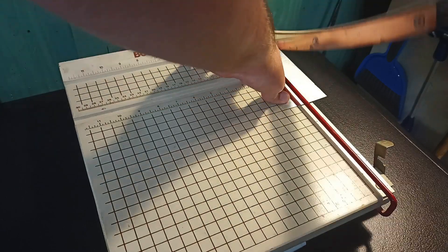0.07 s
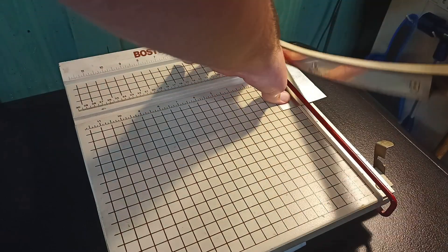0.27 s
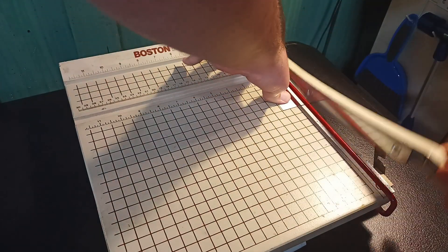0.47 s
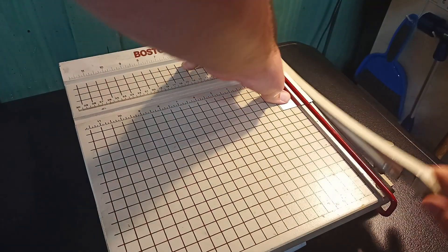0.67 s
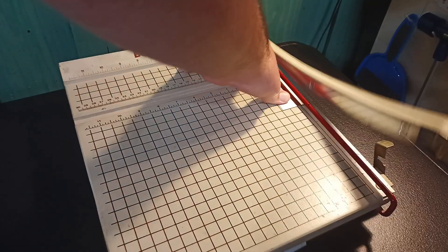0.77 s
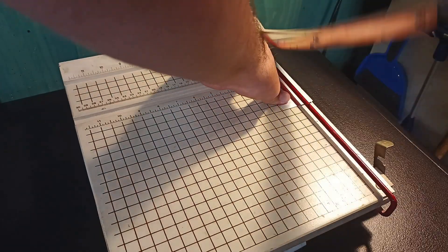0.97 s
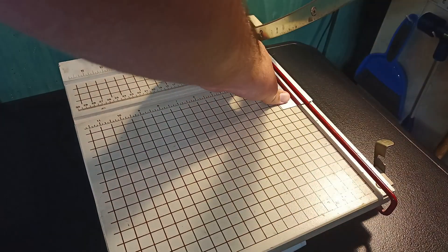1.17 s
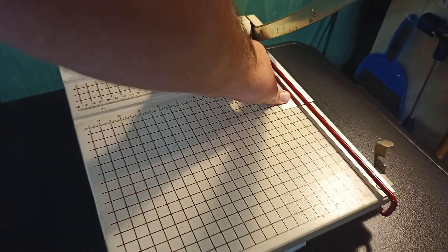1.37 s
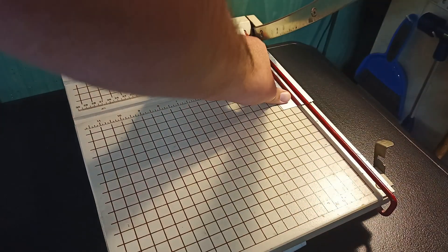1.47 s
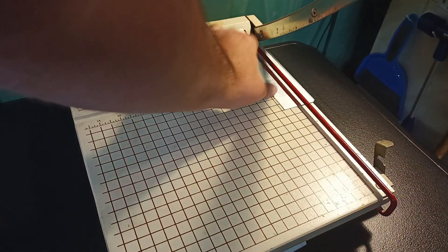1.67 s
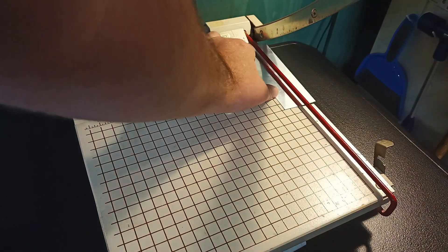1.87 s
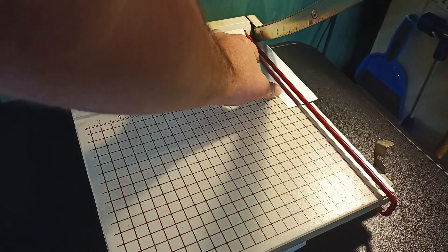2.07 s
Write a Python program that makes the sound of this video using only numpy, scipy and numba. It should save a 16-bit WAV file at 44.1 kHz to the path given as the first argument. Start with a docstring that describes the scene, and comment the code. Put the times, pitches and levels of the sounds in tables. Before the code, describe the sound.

Lever cutter blade shearing a metal strip, rasping down and up, then knocks and light ticks.

```python
"""A lever paper cutter shears a strip of thin aluminium in a small, quiet workshop, stereo microphone close.
The blade grinds down along the fixed edge, its stick-slip friction ringing arm and board, and catches once.
It scrapes back up, catches again, and at 1.2 s the lever knocks against its stop.
Last, a hand slides the strip forward with a light scrape and small ticks against the guide."""
import sys
import numpy as np
from scipy import signal
from scipy.fft import rfft, irfft
from scipy.io import wavfile
from scipy.ndimage import uniform_filter1d
from numba import njit

SR = 44100
rng = np.random.default_rng(int(sys.argv[2]) if len(sys.argv) > 2 else 0)


def persist_wave(psi):
    """Save psi, clipped to +-1, as 16-bit WAV."""
    counts = np.round(np.clip(psi, -1, 1) * 32767).astype(np.int16)
    wavfile.write(sys.argv[1], SR, np.atleast_2d(counts).T)


N = 92610
T = np.arange(N) / SR
FREQS = np.maximum(np.arange(N + 1) * SR / (2 * N), 1)

# likeness of left and right at the microphone (f/Hz, correlation)
LIKENESS = [(220, 0.99), (400, 0.85), (700, 0.17), (3500, .1), (8000, 0.82)]
# modes of the cutter's board (f/Hz, level/dB, t60/s)
BOARD_MODES = [(82, -12.5, .35), (146.8, -3, 0.45), (175, -12.5, 0.32), (229.3, 5, 0.21)]
# spectrum of the dull thump of board and table (f/Hz, level/dB)
THUMP_COLOUR = [(30, -38.5), (70, -6.5), (200, 8), (520, -13.5), (2000, -61.5)]
# spectrum of the steel edge's hiss (f/Hz, level/dB)
HISS_COLOUR = [(2600, -9), (3600, -1), (6800, -1), (8200, -8.5), (9400, -11.5), (10500, -19.5),
               (15500, -27)]


def amp(db):
    """Decibels to gain."""
    return 10 ** (np.asarray(db) / 20)


def unit(x):
    """Scale to rms 1."""
    return x / np.sqrt(np.mean(x ** 2) + 1e-30)


def burst(x):
    """Scale a decaying sound to rms 1 over its first 10 ms."""
    return x / np.sqrt(np.mean(x[:, :SR // 100] ** 2))


def steady(x):
    """Scale to a running rms of 1."""
    power = uniform_filter1d(uniform_filter1d(np.mean(x ** 2, axis=0), size=900), size=900)
    return x / np.sqrt(np.abs(power) + 1e-20)


def along_hz(points):
    """Join (f/Hz, value) points on a log-frequency axis."""
    hz, value = np.array(points).T
    return np.interp(np.log(FREQS), np.log(hz), value)


def colour(x, points, tilt=0):
    """Minimum-phase filter with the given spectrum, tilted in dB per octave above 800 Hz."""
    spectrum_db = along_hz(points) + tilt * np.log2(np.maximum(FREQS, 800))
    cepstrum = irfft(np.log(amp(spectrum_db)))
    cepstrum[1:N] *= 2
    cepstrum[N + 1:] = 0
    return irfft(rfft(x, 2 * N) * np.exp(rfft(cepstrum)))[..., :N]


def noise():
    """Stereo noise, left and right alike in the bass and the high treble."""
    white = rng.standard_normal((2, N))
    likeness = np.clip(along_hz(LIKENESS), -.99, .99)
    mid, side = irfft(rfft(white, 2 * N) * np.sqrt([1 + likeness, 1 - likeness]))[:, :N]
    return np.array([mid + side, mid - side])


def decay(t60):
    """Exponential fade, 60 dB in t60 seconds."""
    return np.exp(-np.log(1000) * np.minimum(T / max(t60, 1e-3), 10))


def at(x, start):
    """Delay a sound to its start in seconds."""
    return np.pad(x, ((0, 0), (int(start * SR), 0)))[:, :N]


def drive(force, response):
    """Play a force through a body's response."""
    return signal.fftconvolve(np.atleast_2d(force), response, axes=1)[:, :N]


def mode(hz, db, t60):
    """One ringing mode, out of step between left and right where their likeness is low."""
    apart = np.arccos(np.clip(np.interp(hz, FREQS, along_hz(LIKENESS)), -1, 1)) / 2
    return amp(db) * np.sin(2 * np.pi * hz * T - np.array([[1], [-1]]) * apart) * decay(t60)


def body(modes, spectrum, noise_db, t60):
    """A body's response: its clear modes plus fading noise for the dense ringing between them."""
    return unit(sum(modes)) + amp(noise_db) * unit(colour(noise() * decay(t60), spectrum))


@njit
def sweep(x, hz, width):
    """Band-pass with a moving centre; width is 1/Q."""
    y, band_state, low_state = np.empty(len(x)), 0., 0.
    for i in range(len(x)):
        g = np.tan(np.pi * hz[i] / SR)
        band = (band_state + g * (x[i] + 1e-18 - low_state)) / (1 + g * (g + width))
        band_state = 2 * band - band_state
        low_state += 2 * g * band
        y[i] = width * band
    return y


def friction(slips_per_s=1600, scatter_db=1, judder_db=1, judder_hz=70):
    """Dense stick-slip clicks of uneven size, swelling and sinking with a slight judder."""
    hold = int(SR / judder_hz)
    judder = uniform_filter1d(rng.standard_normal(N)[np.arange(N) // hold], hold // 2)
    clicks = (rng.random(N) < slips_per_s / SR) * rng.choice([-1, 1], N)
    return clicks * amp(scatter_db * rng.standard_normal(N) + judder_db * judder)


def rasp(x, depth_db=3.5):
    """The grinding surges unevenly: narrow bands swell and sink for a few hundredths of a second."""
    _, _, bands = signal.stft(x, nperseg=512)
    surge = rng.standard_normal(bands.shape[1:])
    for axis in (0, 1):
        surge = uniform_filter1d(surge, size=4, axis=axis)
    return signal.istft(bands * amp(depth_db * unit(surge)))[1][:, :N]


def stroke(levels, upward, blade_db, edge_db, grind_db, hiss_db, board_tilt, left_db):
    """One pass of the blade: friction shakes the board, rings the blade and hisses on the edge."""
    # where the edges touch (t/s, place from 0 at the pivot to 1 at the tip)
    contact = [(.15, 0.71), (.23, 0.19), (.48, 0.37), (.58, 0.23), (.76, 0.69), (.85, 1), (.90, 0.49),
               (.93, 0.21), (1.04, 0.16), (1.11, 0.58)]
    # modes of blade and arm (f/Hz, level going down/dB, level going up/dB)
    blade_modes = [(444.5, 11.5, 7), (559.6, -22, -12), (874.6, -2.5, -15.5), (1391, 2, -5),
                   (1407, -26, -22.5), (1601, 7, -6), (1940, 7, -16.5)]
    # spectrum of the blade's dense ringing (f/Hz, level/dB)
    grind_colour = [(250, -31), (390, -7), (850, 6.5), (1060, 0.5), (1350, 6), (2200, 3), (3500, -2),
                    (5000, -55)]
    # modes of the steel edge (f/Hz, level/dB)
    edge_modes = [(5305, -11.5), (6358, 3), (6675, -1.5), (7028, 0), (8253, -16)]
    pivot_hz, tip_hz = 338, 3350  # the grinding rises in pitch towards the tip

    times, *curves = np.array(levels).T
    fade = np.interp(T, [times[0] - .01, times[0] + .005, times[-1] - .005, times[-1] + .015], [0, 1, 1, 0])
    board_gain, blade_gain, edge_gain = (fade * amp(np.interp(T, times, db)) for db in curves)
    slips = friction()
    place = np.clip(np.interp(T, *np.array(contact).T), 0, 1)
    focused = sweep(slips, pivot_hz * (tip_hz / pivot_hz) ** place, width=.9) + 0.37 * slips

    board_tones = [mode(hz, db + board_tilt * np.log2(hz), t60 / 2) for hz, db, t60 in BOARD_MODES]
    board = body(board_tones, THUMP_COLOUR, noise_db=-6.5, t60=0.14)
    blade_tones = [mode(hz, up if upward else down, t60=0.12) for hz, down, up in blade_modes]
    blade_tones[0] *= amp(np.array([[left_db], [-left_db]]) / 2)  # the arm's lowest mode sits off centre
    blade = body(blade_tones, grind_colour, grind_db, t60=0.14)
    edge_tones = [mode(hz, db, t60=0.043) for hz, db in edge_modes]
    edge = body(edge_tones, HISS_COLOUR, hiss_db, t60=0.051)

    rumble = board_gain * steady(drive(slips, board))
    grind = amp(blade_db) * blade_gain * steady(rasp(drive(focused, blade)))
    hiss = amp(edge_db) * edge_gain * steady(rasp(drive(slips, edge)))
    return rumble + grind + hiss


def edge_snaps():
    """Bright cracks where the edge catches and snaps free."""
    # catches of the edge (t/s, level/dB, t60/s)
    catches = [(0.631, -22, 0.048), (1.186, -22.5, 0.055)]
    return sum(amp(db) * at(burst(colour(noise() * decay(t60), HISS_COLOUR)), start)
               for start, db, t60 in catches)


def lever_knocks(push_s=0.0047):
    """The lever hits its stop and rebounds: each hard clack comes with a thud of board and table."""
    # hits on the stop (t/s, relative thud level/dB, clack level/dB, clack tilt/dB per octave)
    hits = [(1.2237, -16, -18, 0.5), (1.228, -19, -33.5, 2), (1.2369, -19, -30, -7), (1.274, -14, -25, -17),
            (1.387, -41, -24.5, 2), (1.3925, -9.5, -18.5, -6.5)]
    # spectrum of the clack (f/Hz, level/dB)
    clack_colour = [(60, -0.5), (480, 3.5), (900, -5), (1500, -8), (6000, -30), (12000, -59)]
    push = np.sin(np.pi * np.minimum(T / push_s, 1))
    board = burst(drive(push, sum(mode(*row) for row in BOARD_MODES)))
    knocks = 0
    for start, thud_db, clack_db, tilt in hits:
        thud = amp(-4) * board + amp(-10.5) * burst(colour(noise() * decay(0.15), THUMP_COLOUR))
        clack = burst(colour(noise() * (decay(0.09) + amp(-11) * decay(0.2)), clack_colour, tilt))
        knocks += at(amp(thud_db) * thud + amp(clack_db) * clack, start)
    return knocks


def strip_slides(release_t60=0.075):
    """Short gritty rubs of strip and hand over the board."""
    # rubs on the board (t/s, level/dB, attack/s, hold/s)
    rubs = [(1.394, -42, 0.013, 0.018), (1.517, -56.5, 0.019, 0.077), (1.777, -34, 0.024, .025),
            (1.964, -53.5, .006, 0.016)]
    # spectrum of the rubbing (f/Hz, level/dB)
    rub_colour = [(600, -16), (1000, 5.5), (2300, -12), (4500, 12.5), (7500, 9.5), (9500, 3.5),
                  (15000, -12.5)]
    grit = steady(colour(drive(friction(), noise() * decay(0.011)), rub_colour))
    envelope = 0
    for start, db, attack, hold in rubs:
        rise = np.clip((T - start) / attack, 0, 1)
        fall = np.exp(-np.log(1000) * np.maximum(T - start - attack - hold, 0) / release_t60)
        envelope += amp(db) * rise * fall
    return grit * envelope


def strip_ticks():
    """Light taps against the guide ring the thin strip."""
    # taps on the guide (t/s, level/dB, tilt/dB per octave)
    taps = [(1.794, -38.5, -7), (1.986, -40.5, 8), (2.009, -50.5, 4), (2.067, -44.5, -4.5)]
    # spectrum of a tap (f/Hz, level/dB)
    tap_colour = [(220, -2), (550, -13), (1000, 3), (2200, 9), (2800, 9.5), (6200, 1), (15000, -39.5)]
    # modes of the aluminium strip (f/Hz, level/dB)
    strip_modes = [(1470, -4.5), (3260, 1.5), (3990, 1), (5860, 4)]
    ring = burst(sum(mode(hz, db, t60=0.1) for hz, db in strip_modes))
    ticks = 0
    for start, db, tilt in taps:
        tap = burst(noise() * decay(0.19)) + amp(-4.5) * ring
        ticks += amp(db) * at(burst(colour(tap, tap_colour, tilt)), start)
    return ticks


def scene():
    """The cutter from close by, with the workshop's short tail and faint room tone behind it."""
    # course of the downstroke (t/s, relative levels of board/dB, blade/dB, edge/dB)
    down_levels = [(.04, -98, -80, -65), (.13, -108, -59.5, -51), (.165, -40.5, -41.5, -38.5),
                   (.22, -28.5, -38.5, -43.5), (.35, -29, -33, -35), (.43, -19.5, -27.5, -30.5),
                   (.52, -16, -26.5, -25.5), (.58, -22.5, -18, -23.5), (.65, -22.5, -28.5, -20.5),
                   (.72, -28.5, -32, -21.5), (.77, -34.5, -37.5, -19), (.805, -48, -39.5, -33.5)]
    # course of the upstroke (t/s, relative levels of board/dB, blade/dB, edge/dB)
    up_levels = [(.805, -40.5, -34, -34), (.865, -37, -22.5, -26), (.925, -35.5, -21, -32),
                 (.98, -21.5, -19.5, -31), (1.04, -30, -21.5, -33.5), (1.12, -23.5, -28.5, -26),
                 (1.145, -23, -45.5, -31.5), (1.185, -41, -35.5, -39.5), (1.21, -30, -44, -43.5)]
    down = stroke(down_levels, upward=False, blade_db=3.5, edge_db=-2,
                  grind_db=2.5, hiss_db=4.5, board_tilt=2, left_db=-1.5)
    up = stroke(up_levels, upward=True, blade_db=4.0, edge_db=4,
                grind_db=0.5, hiss_db=17, board_tilt=33, left_db=4.5)
    direct = down + up + edge_snaps() + lever_knocks() + strip_slides() + strip_ticks()
    # spectrum of the room tone (f/Hz, level/dB)
    room_colour = [(130, 15), (400, -6), (6000, -11), (15000, -27.5)]
    room_tail = unit(at(noise() * decay(0.14), 0.0065)) / np.sqrt(N)
    room_tone = amp(-64.5) * unit(colour(noise(), room_colour))
    return direct + amp(-21) * drive(direct, room_tail) + room_tone


def record(dry, low_cut_hz=94, top_hz=15950):
    """The recorder cuts the deep bass and the top."""
    low_cut = signal.butter(3, low_cut_hz, "high", fs=SR, output="sos")
    high_cut = signal.ellip(10, .2, 80, top_hz, fs=SR, output="sos")
    return signal.sosfilt(high_cut, signal.sosfilt(low_cut, dry))


dry = scene()
out = record(dry)
persist_wave(out)
```